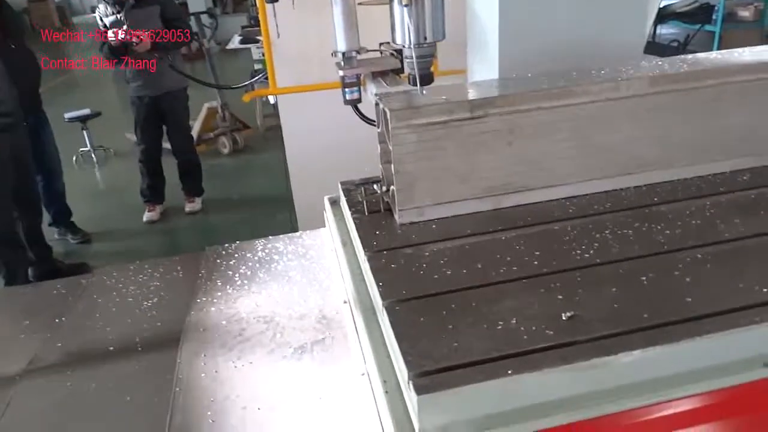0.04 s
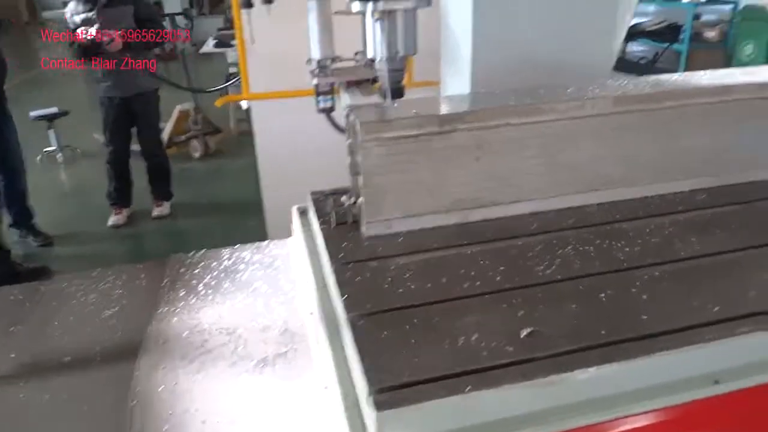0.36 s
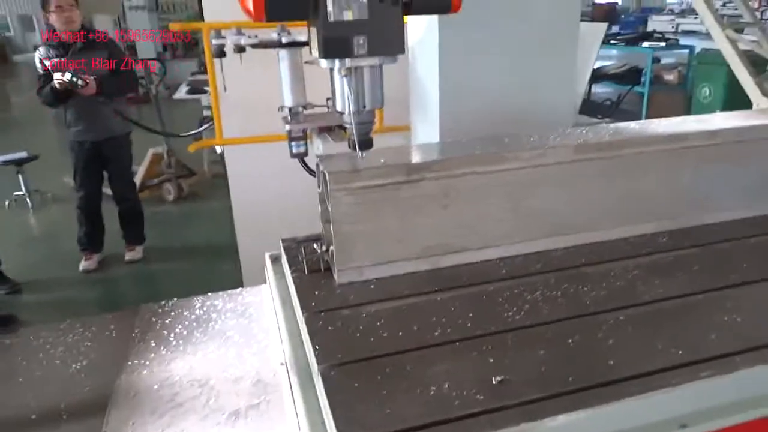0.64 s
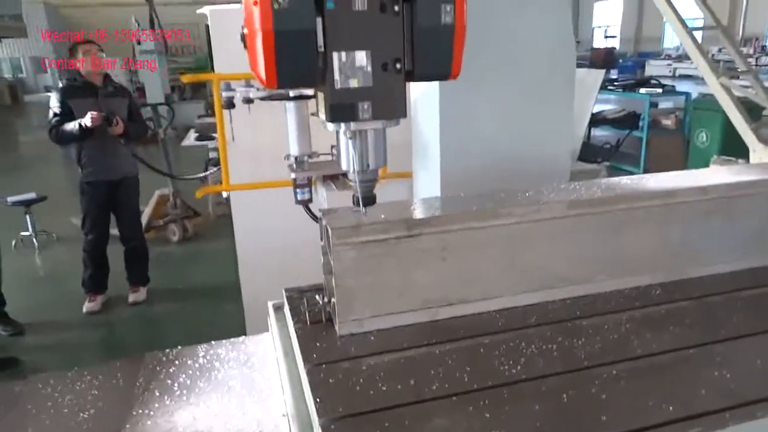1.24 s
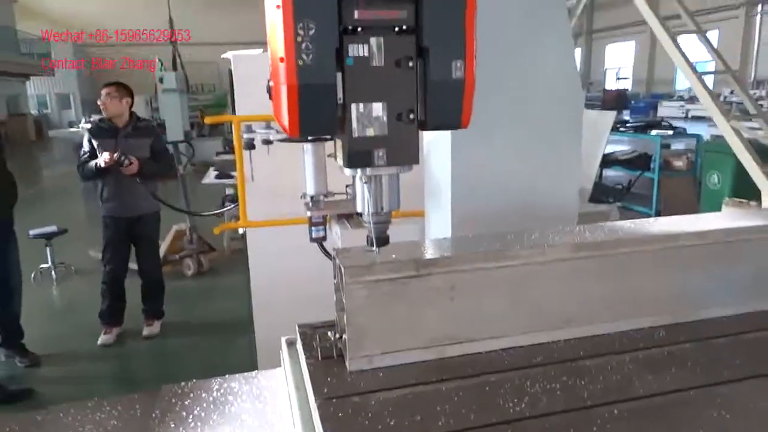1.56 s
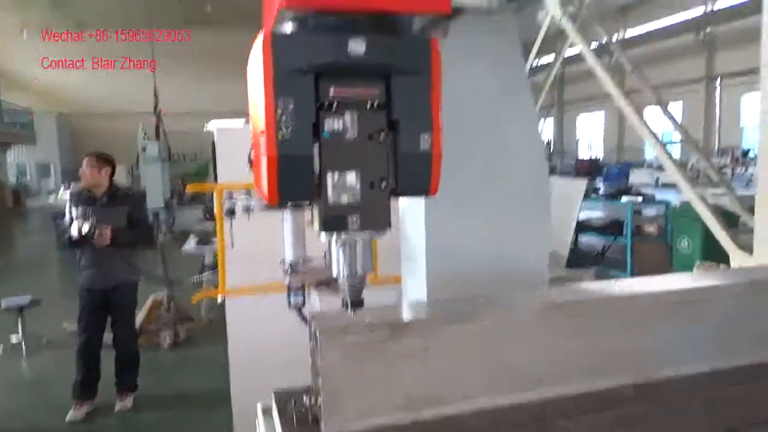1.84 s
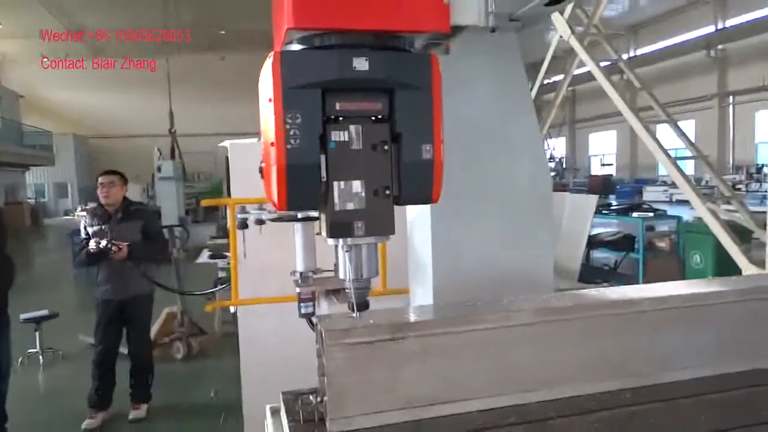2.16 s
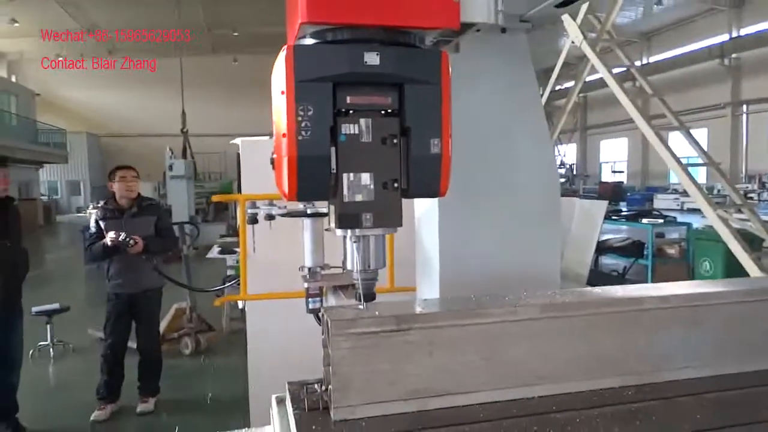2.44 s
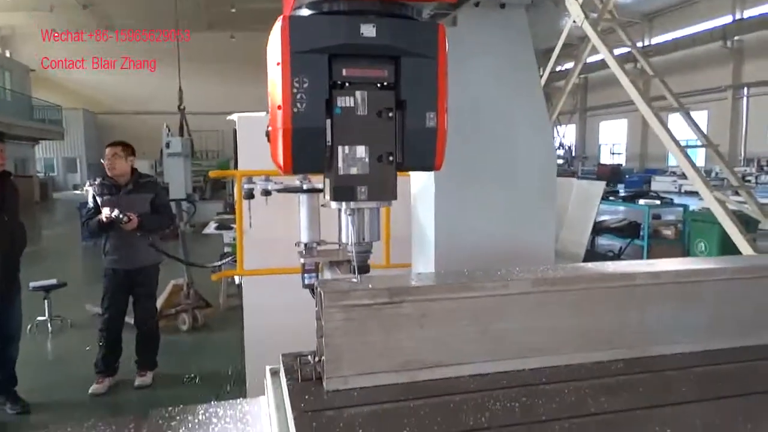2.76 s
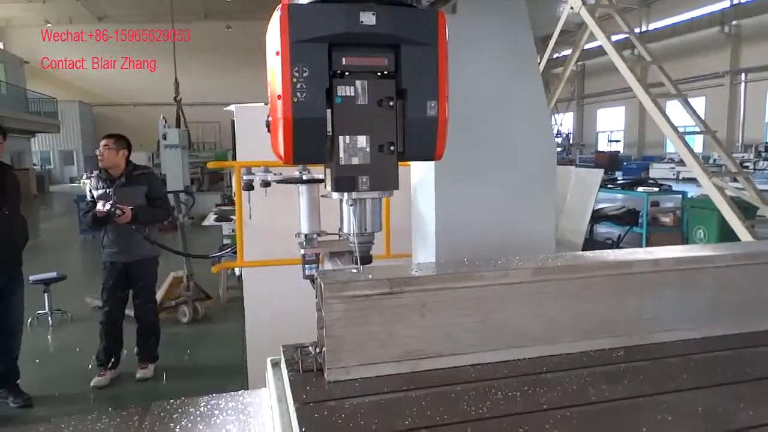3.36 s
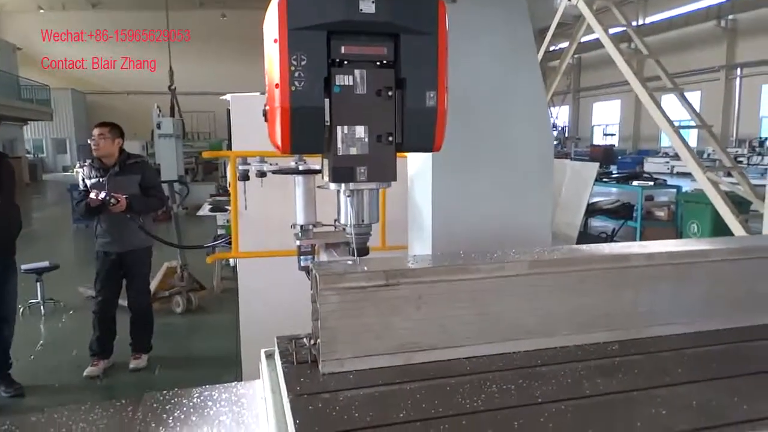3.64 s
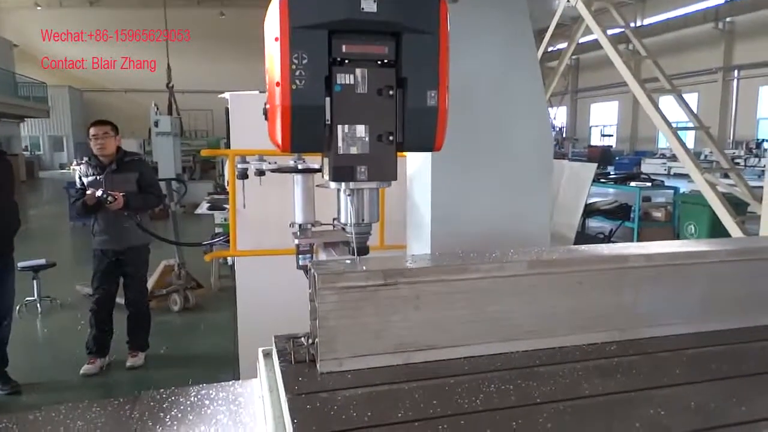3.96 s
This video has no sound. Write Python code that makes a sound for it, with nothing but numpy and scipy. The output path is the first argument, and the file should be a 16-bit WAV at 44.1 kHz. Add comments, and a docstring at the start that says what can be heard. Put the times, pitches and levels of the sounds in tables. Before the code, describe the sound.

Milling machine humming and hissing, its cutter squealing unevenly on a metal beam.

```python
"""A large milling machine runs a two-flute cutter along a metal beam in a factory hall.
From the start the spindle hums at its turning and tooth rates, the drives whine, and air and chips
hiss at the cutter. After a second the beam starts to chatter, one short squeal per turn, and the
microphone is raised slowly, changing the colour of the hiss. The air jet's whistles and a faint
wavering tone fade before two seconds; hum, squeal and hiss carry on over the noise of the hall."""
import sys
import numpy as np
from scipy import signal
from scipy.fft import rfft, irfft
from scipy.io import wavfile

SR = 44100
rng = np.random.default_rng(int(sys.argv[2]) if len(sys.argv) > 2 else 0)


def wav_out(sig):
    """Save sig, one row per channel (or a flat mono array), as 16-bit PCM at SR to the path in sys.argv[1]."""
    wavfile.write(sys.argv[1], SR, np.round(np.clip(np.atleast_2d(sig).T, -1, 1) * 32767).astype(np.int16))


N = 176400
TIME = np.arange(N) / SR
BIN_HZ = np.maximum(np.arange(N // 2 + 1) * SR / N, 1)


# The body of the hum. Each row: time in seconds, turning-rate and tooth-rate levels in relative dB.
HUM = [(0.05, -27.5, -16.5), (0.44, -29, -18), (1.06, -29, -18), (1.15, -31, -16.5), (1.95, -26.5, -16.5),
       (2.05, -28, -16), (2.15, -25.5, -17), (3.88, -25.5, -17), (3.9, -25.5, -16.5)]
# Quiet partials above it. Each row: multiple of the turning rate, level in dB.
OVERTONES = [(3, -52), (4, -47.5), (5, -51), (6, -48), (8, -50.5)]
# The seventh partial swells early on. Each row: time in seconds, level in dB.
SEVENTH_SWELL = [(0, -75), (.3, -37.5), (.42, -45), (.53, -33.5), (.64, -37.5), (.75, -36), (.9, -36.5),
                 (1.03, -49), (2.1, -55), (2.8, -45.5), (4, -46)]
# The 28th partial whines in late surges. Each row: time in seconds, level in dB.
WHINE_SURGES = [(0, -58), (2.35, -62), (2.55, -40), (2.8, -48), (3.05, -47), (3.25, -36), (3.36, -53),
                (3.5, -41), (3.72, -42), (3.85, -48), (4, -40)]

def spindle(turns):
    """The spindle hums at its turning rate, the tooth rate (two flutes a turn) and their multiples."""
    turn_db, tooth_db = in_time(HUM)
    turning = tone(turns, turn_db - 1.5, waver_db=-0.02)
    teeth = tone(2 * turns, tooth_db + 0.5, waver_db=-0.02)
    overtones = sum(tone(multiple * turns, db) for multiple, db in OVERTONES)
    seventh = tone(7 * turns, curve(SEVENTH_SWELL), waver_db=1)
    whine = tone(28 * turns, curve(WHINE_SURGES), waver_db=1)
    return turning + teeth + overtones + seventh + whine


# The beam's two modes shift as the cutter travels. Each row: time in seconds, pitch in Hz.
LOWER_PITCH = [(1.1, 4570), (1.9, 4600), (2.3, 4530), (3.9, 4550)]
UPPER_PITCH = [(1.1, 4850), (2.45, 4875), (2.6, 4960), (2.85, 4935), (3.2, 4990), (3.45, 4945), (4, 4945)]
# Squeals ring longer where the chatter is strongest. Each row: time in seconds, ring time in seconds.
LOWER_RING = [(1.1, .001), (2.4, .0015), (4, .0012)]
UPPER_RING = [(1.1, .0011), (2, .0011), (2.45, .0016), (2.7, .0009), (4, .0009)]
# Each mode flares and drops out. Each row: time in seconds, level in relative dB.
LOWER_FLARES = [(1.09, -47.5), (1.16, -33.0), (1.38, -41.5), (1.48, -41), (1.51, -32.0), (1.7, -34.0),
                (1.73, -40.5), (2.03, -32.5), (2.2, -34.0), (2.25, -45.5), (2.33, -34.5), (2.39, -49.0),
                (2.41, -35.5), (2.5, -38.0), (2.53, -48.0), (2.68, -40.0), (2.7, -49.0), (2.77, -49),
                (2.81, -36.0), (2.95, -40.5), (2.96, -47.0), (3.23, -39.0), (3.33, -49.0), (3.44, -32.5),
                (3.8, -40.5), (3.83, -49.0), (3.89, -33.5), (3.99, -39.5)]
UPPER_FLARES = [(1.04, -49.0), (1.14, -49.0), (1.16, -38.5), (1.38, -40.0), (1.4, -47.0), (1.45, -40),
                (1.49, -49.0), (1.56, -36.5), (1.63, -48.5), (1.89, -49.0), (1.91, -40.0), (2.0, -34.0),
                (2.06, -41.0), (2.09, -35.0), (2.2, -32.5), (2.26, -42.5), (2.31, -32.0), (2.41, -30.0),
                (2.66, -36.5), (2.7, -49.0), (2.74, -49.0), (2.76, -39.5), (2.86, -33), (2.95, -34.5),
                (3.06, -49.0), (3.23, -32.5), (3.38, -40.5), (3.4, -32.5), (3.74, -34.5), (3.78, -49.0),
                (3.83, -49.0), (3.84, -42.0), (3.9, -30.5), (3.99, -39.5)]

def chatter(turns, turn_hz):
    """Once the cutter bites, two neighbouring modes of the beam swell and break off."""
    start_s, onset_s = 1, 0.1
    lower = from_db(-1.5) * squeal(turns, turn_hz, LOWER_PITCH, LOWER_RING, LOWER_FLARES)
    upper = from_db(1.2) * squeal(turns, turn_hz, UPPER_PITCH, UPPER_RING, UPPER_FLARES)
    fade_in = np.clip((TIME - start_s) / onset_s, 0, 1)
    return fade_in * (lower - upper)   # neighbouring modes swing in opposite phase


def squeal(turns, turn_hz, pitch, ring, flares):
    """One mode of the beam, kicked unevenly once a turn; most of the ring slips in phase each turn."""
    bite_spread_db, flutter_db, slip_cycles_per_turn = 1.3, 1.5, 0.83
    radiating_band_hz = [4370, 5440]
    turn = turns.astype(int)
    age_s = turns % 1 / turn_hz
    ring_s = curve(ring)
    bite = from_db(bite_spread_db * rng.standard_normal(N)[turn] + flutter_db * drift(28))
    burst = bite * age_s * np.exp(-age_s / ring_s) / ring_s ** 1.5   # a longer ring adds no energy
    cycles = curve(pitch) * age_s
    slipping = np.sin(2 * np.pi * (cycles + slip_cycles_per_turn * turn + 0.055 * drift(10)))
    locked = np.sin(2 * np.pi * (cycles + 0.17 * drift(13)))
    band = signal.butter(3, radiating_band_hz, "band", fs=SR, output="sos")
    radiated = signal.sosfilt(band, burst * (slipping + 0.2 * locked))
    return from_db(curve(flares)) * rms_one(radiated)


# Slapback on the squeal. Each row: delay in seconds, level in dB, left over right in dB.
ECHOES = [(.0132, -24.5, 23), (.033, -56, -3)]

def echoed(direct):
    """The direct sound plus its reflections from the machine and the hall."""
    sides = np.array([[.5], [-.5]])
    return direct + sum(np.interp(TIME - delay_s, TIME, direct, left=0) * from_db(db + pan_db * sides)
                        for delay_s, db, pan_db in ECHOES)


# The ride on the hiss. Each row: time in seconds, level in relative dB, brightness (higher is brighter).
HISS_RIDE = [(0.04, -29.5, 4), (0.08, -29, 1), (0.43, -28, 4), (0.44, -27.5, 5), (0.98, -27.5, -0.5),
             (1.69, -27, -8), (1.77, -26, -8), (2.14, -27.5, -16), (2.24, -26.5, -10.5), (3.91, -26, -6),
             (3.95, -25.5, -7)]
# The microphone's rise. Each row: time in seconds, position (0 by the table, 1 rising, 2 at the head).
MIC_POSITION = [(.95, 0), (1.4, 1), (2.05, 1), (2.7, 2)]
# The colour of the hiss at those positions. Each row: frequency in Hz, density in relative dB.
HISS_BY_TABLE = [(600.0, -20), (1000.0, -11), (1120.0, -3.5), (1320.0, -5.5), (1480.0, 0.5), (1630.0, -8.5),
                 (1880.0, -11.5), (2210.0, -5), (2400.0, -9.5), (3110.0, 1), (3840.0, -11), (4030.0, -4),
                 (4450.0, -2.5), (4820.0, -3.5), (5140.0, -8), (6250.0, 1), (6670.0, -2.5), (7590.0, 1.5),
                 (8650.0, -4.5), (9080.0, -4), (9840.0, -7.5), (10170.0, -3), (11030.0, -11.5),
                 (11770.0, -10.5), (14290.0, -14), (15010.0, -20.5), (15500.0, -23)]
HISS_RISING = [(600, -19), (1000, -13), (1100, -7), (1280, -6.5), (1500, -2), (1760, -10), (2070, -4),
               (2480, -7.5), (2690, -10), (2780, 2.5), (2920, -3.0), (3110, 2), (3660, -7.5), (4370, -3.5),
               (5580, -6.5), (5760, -4), (6560, -2), (7470, -2), (8100, -3.5), (8370, -0.5), (9080, -5),
               (10000, -4.5), (12970, -13.5), (13390, -11), (14530, -17.0), (15250, -23.5), (15500, -21)]
HISS_AT_HEAD = [(600.0, -20.5), (1000.0, -4.5), (1200.0, -6), (1500.0, -1), (1790.0, -10), (2010.0, -3.5),
                (2210.0, -4.5), (2360.0, -1.5), (2920.0, -8), (3160.0, 1), (3490.0, -1.5), (3660.0, -7.5),
                (4170.0, -10.5), (4370.0, -12), (4590.0, -5), (5140.0, -3.5), (6150.0, -7), (7000.0, 1),
                (8230.0, -3.5), (8510.0, 3), (9380.0, -6), (10000.0, -3.5), (11030.0, -9.5), (12760.0, -12),
                (14060.0, -12), (15010.0, -19), (15500.0, -25)]
# Its stereo width. Each row: frequency in Hz, side against mid in dB.
HISS_WIDTH = [(700, 4), (1300, -17), (2400, -23.5), (4400, -37), (8000, -20.5), (11000, -19.5),
              (13000, -49)]

def hiss():
    """Air and chips hiss at the cutter, changing colour as the microphone passes three positions."""
    treble_hz, flicker_db = 9600, 0.64
    level_db, brightness = in_time(HISS_RIDE)
    position = curve(MIC_POSITION)
    air = 0
    for spot, (colour, db) in enumerate([(HISS_BY_TABLE, 4.5), (HISS_RISING, 2), (HISS_AT_HEAD, 2)]):
        crossfade = np.sqrt(np.clip(1 - abs(position - spot), 0, 1))
        air += crossfade * from_db(db) * noise(rippled(colour), per_bin(HISS_WIDTH))
    treble = irfft(rfft(air) / (1 + (treble_hz / BIN_HZ) ** 10), N)
    treble_db = 0.36 * (brightness - brightness.mean())
    air = air - treble + treble * from_db(treble_db)
    return air * from_db(level_db + flicker_db * drift(13))


def rippled(colour, depth_db=1.4, spacing_hz=170):
    """A spectrum with the fine, irregular peaks and dips that nearby surfaces give it."""
    hz = np.arange(0, SR / 2, spacing_hz)
    return per_bin(colour) + depth_db * np.interp(BIN_HZ, hz, rng.standard_normal(len(hz)))


# Breathy whistles. Each row: centre in Hz, half-width in Hz, level in relative dB.
WHISTLES = [(2760, 70, -42), (3090, 35, -41), (7440, 260, -33), (7526, 10, -41), (10056, 45, -43)]
# They swell and sink together. Each row: time in seconds, gain in dB.
WHISTLE_SWELL = [(0, -9), (.3, -6), (.5, -1), (.95, -5), (1.2, -10), (1.45, 0), (1.7, -28)]

def whistles():
    """The air jet sings in a few narrow resonances as the cutter nears the beam's edge."""
    bands = sum(resonance(hz, half_width_hz, db, HISS_WIDTH) for hz, half_width_hz, db in WHISTLES)
    return from_db(curve(WHISTLE_SWELL)) * bands


# A bed of pump and drive tones. Each row: pitch in Hz, level in relative dB.
PUMP_TONES = [(415.3, -60.5), (498.5, -50), (748, -52), (803, -61), (830.9, -50.5), (942, -60.5),
              (1440.3, -53), (1468, -51.5), (1579, -53.5), (1884, -55)]
# They swell as the microphone crosses the hall's standing waves. Each row: time in seconds, gain in dB.
PUMP_SWELL = [(0, 1.5), (.7, 5.5), (1.4, 3.5), (2.05, 1.5), (2.5, 2.5), (3.05, 6), (4, 5)]

def drives():
    """The pumps hold steady pitches under the high, even whine of the drives."""
    whine_hz = 7526
    pumps = sum(tone(hz * TIME, db + curve(PUMP_SWELL)) for hz, db in PUMP_TONES)
    return pumps + tone(whine_hz * TIME, level_db=-40, waver_db=0)


# The path of a faint tone. Each row: time in seconds, pitch in Hz.
WAVERING_PITCH = [(0, 655), (.3, 630), (.52, 655), (.62, 705), (.8, 695), (1.0, 655), (1.2, 605)]

def wavering_tone():
    """A faint, rough tone wanders in pitch by the table, then fades away."""
    jitter_hz, flicker_db, end_s, fade_s = 12, 2.5, 1.8, 0.3
    cycles = np.cumsum(curve(WAVERING_PITCH) + jitter_hz * drift(18)) / SR
    fade_out = np.clip((end_s - TIME) / fade_s, 0, 1)
    return tone(cycles, level_db=-43.5 + flicker_db * drift(14)) * fade_out


# The colours of the machinery bed and the rumble. Each row: frequency in Hz, density in relative dB.
HALL_COLOUR = [(25, -48), (55, -39), (90, -17), (125, -1), (152, 1), (190, -2.5), (235, -2), (280, 9.5),
               (305, 12), (335, 4.5), (400, -3.5), (500, -0.5), (560, -5.5), (650, -8), (760, -8),
               (900, -9), (1100, -15.5), (2000, -50)]
RUMBLE_COLOUR = [(20, -15), (45, -13), (90, 40), (200, -29)]
# The hall's stereo width. Each row: frequency in Hz, side against mid in dB.
HALL_WIDTH = [(60, -4), (150, -18), (300, -3), (600, -12.5), (1200, -36)]
# The rumble peaks while the microphone is moved. Each row: time in seconds, level in dB.
RUMBLE_RIDE = [(0, -63), (.8, -61), (1.15, -62), (1.45, -55), (1.68, -66), (2.03, -58), (2.25, -80),
               (4, -80)]

def hall():
    """Diffuse machinery noise and uneven rumble, with a drone that is higher in front of the head."""
    rumble_swing_db, move_start_s, move_end_s = 6, 1, 2.66
    rumble_db = curve(RUMBLE_RIDE) + rumble_swing_db * drift(8)
    rumble = from_db(rumble_db) * noise(per_bin(RUMBLE_COLOUR), side_db=-41)
    machinery = from_db(-31.5) * noise(per_bin(HALL_COLOUR), per_bin(HALL_WIDTH))
    by_table = resonance(hz=646, half_width_hz=40, db=-46, stereo_width=HALL_WIDTH)
    at_head = resonance(hz=744, half_width_hz=77, db=-45, stereo_width=HALL_WIDTH)
    moved = np.clip((TIME - move_start_s) / (move_end_s - move_start_s), 0, 1)
    drone = np.sqrt(1 - moved) * by_table + np.sqrt(moved) * at_head
    return machinery + drone + rumble


def tone(cycles, level_db, waver_db=2.93):
    """A sine whose level wavers slowly."""
    gain = np.sqrt(2) * from_db(level_db + waver_db * drift(3.9))
    return gain * np.sin(2 * np.pi * (cycles + rng.random()))


def resonance(hz, half_width_hz, db, stereo_width):
    """Stereo noise in one resonant band."""
    peak_db = -10 * np.log10(1 + ((BIN_HZ - hz) / half_width_hz) ** 4)
    return from_db(db) * noise(peak_db, per_bin(stereo_width))


def noise(colour_db, side_db):
    """Stereo noise of a given colour and width, rms 1."""
    mid, side = rfft(rng.standard_normal((2, N))) * from_db(colour_db)
    return rms_one(irfft(mid + from_db(side_db) * side * np.array([[1], [-1]]), N))


def drift(rate_hz):
    """Slow random motion, rms 1."""
    return rms_one(irfft(rfft(rng.standard_normal(N)) / (1 + (BIN_HZ / rate_hz) ** 2), N))


def in_time(rows):
    """Each value column of a time table at every sample."""
    seconds, *columns = np.transpose(rows)
    return [np.interp(TIME, seconds, column) for column in columns]


def curve(rows):
    """A time table's first value column at every sample."""
    return in_time(rows)[0]


def per_bin(rows):
    """A table over frequency, read on a log axis."""
    hz, value = np.transpose(rows)
    return np.interp(np.log(BIN_HZ), np.log(hz), value)


def from_db(db):
    """Decibels to gain."""
    return 10 ** (np.asarray(db) / 20)


def rms_one(x):
    """Scale to unit power."""
    return x / np.sqrt(np.mean(x ** 2) + 1e-20)


# The cutter's nearly steady pace. Each row: time in seconds, tooth passes per second.
TOOTH_RATE = [(0.1, 305.4), (1.2, 304.6), (3.8, 304.6)]

def scene():
    """The spindle's speed drives both hum and chatter; air, drives and hall fill in around them."""
    turn_hz = curve(TOOTH_RATE) / 2
    turns = np.cumsum(turn_hz) / SR
    machine = spindle(turns) + drives() + echoed(chatter(turns, turn_hz))
    return machine + hiss() + whistles() + wavering_tone() + hall()


# A phase skew that spreads the lows. Each row: frequency in Hz, left microphone's lead in radians.
MIC_PHASE = [(40, -0.17), (152, -0.42), (305, -.63), (520, -0.47), (1200, -0.57), (2240, 0.0055)]

def record(dry):
    """Two close microphones hear the lows slightly out of phase; the top is cut steeply."""
    cutoff_hz = 15700
    skew = np.exp(.5j * per_bin(MIC_PHASE) * np.array([[1], [-1]]))
    response = skew / np.sqrt(1 + (BIN_HZ / cutoff_hz) ** 300)
    padded = np.pad(dry, ((0, 0), (0, N)))
    padded_response = np.repeat(response, 2, axis=1)[:, :N + 1]
    return irfft(rfft(padded) * padded_response)[:, :N]


dry = scene()
out = record(dry)
wav_out(out)
```